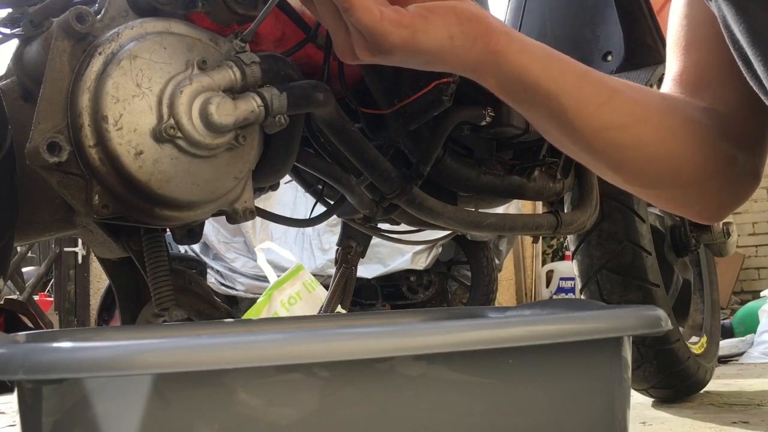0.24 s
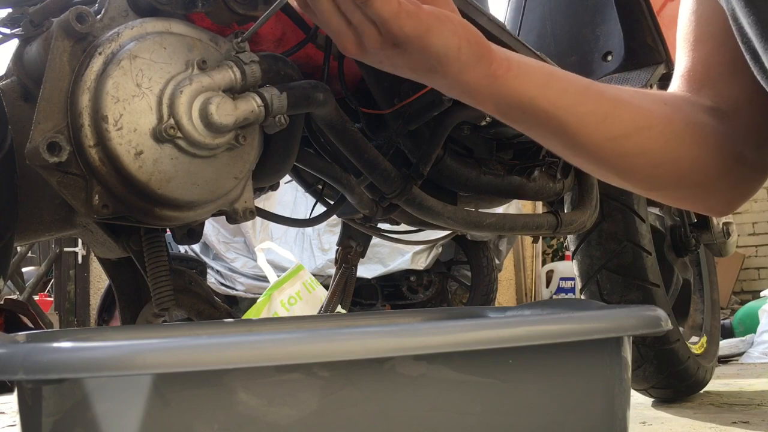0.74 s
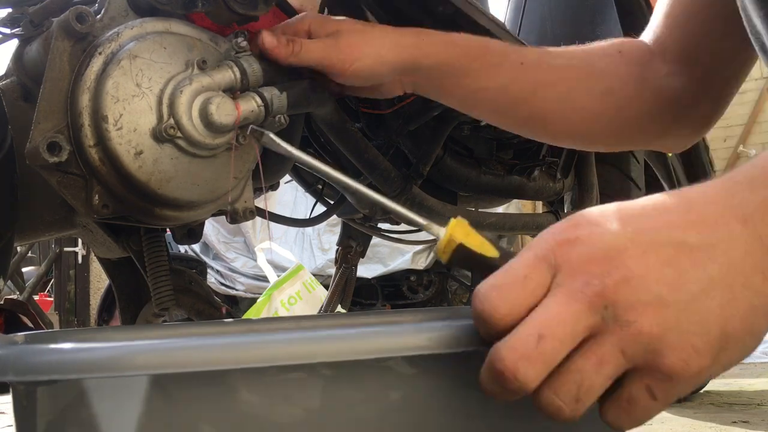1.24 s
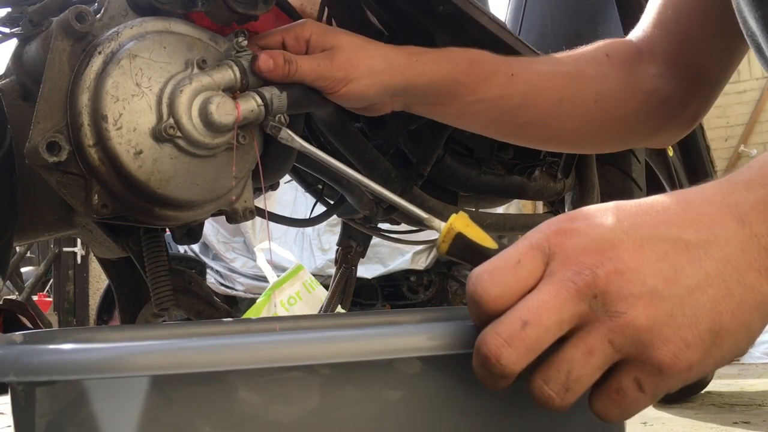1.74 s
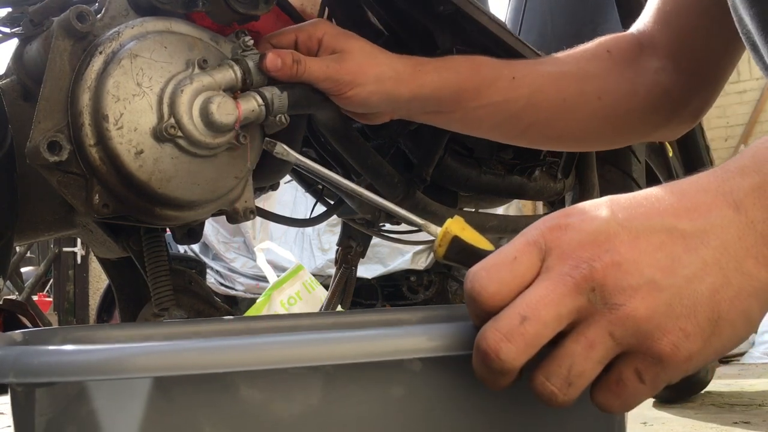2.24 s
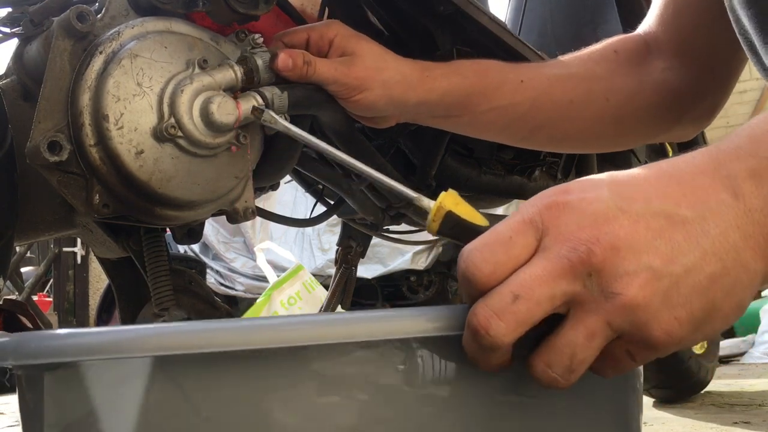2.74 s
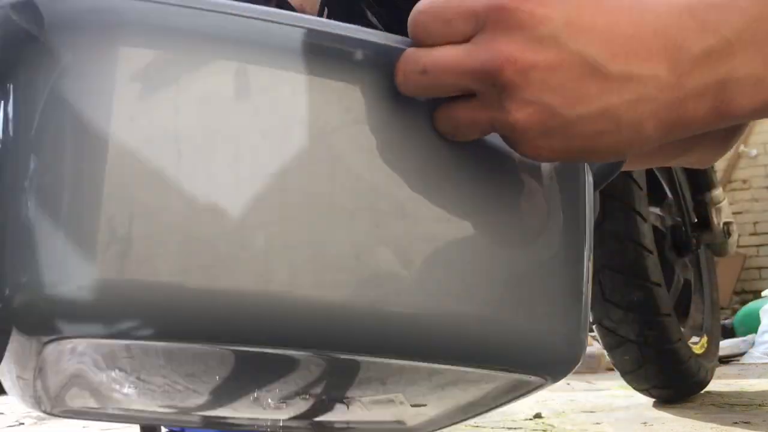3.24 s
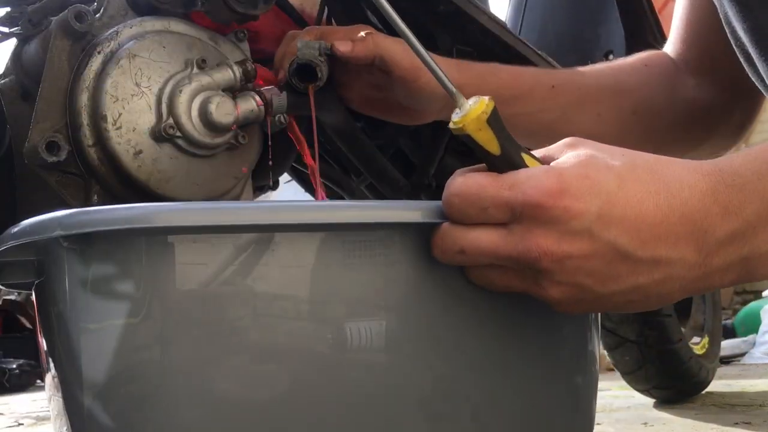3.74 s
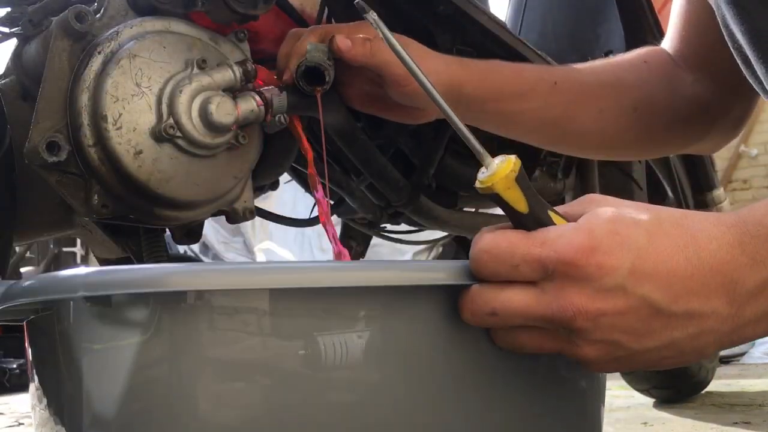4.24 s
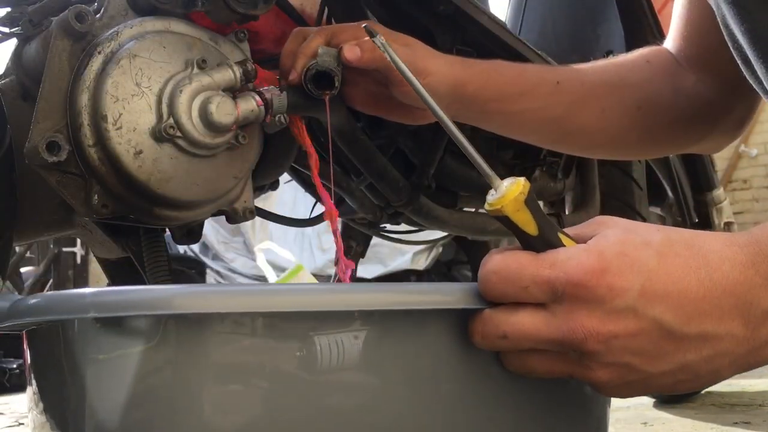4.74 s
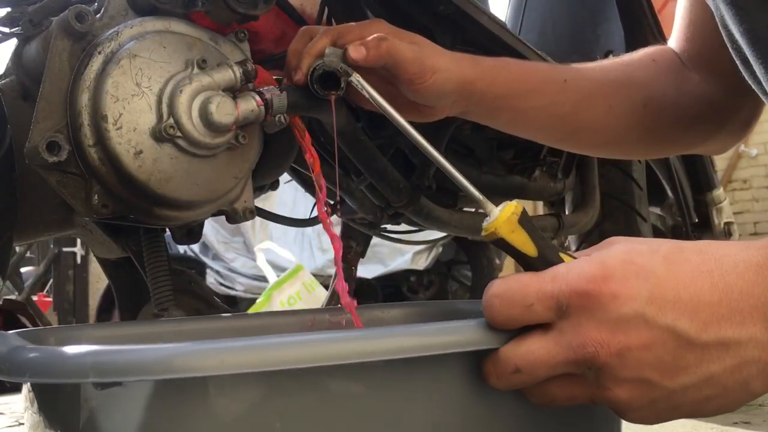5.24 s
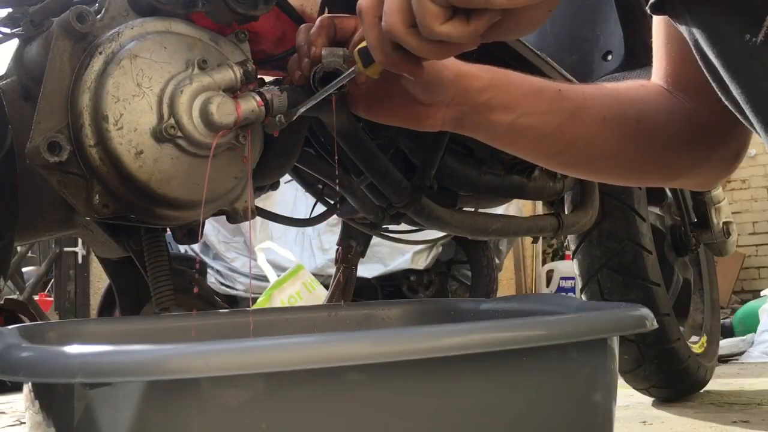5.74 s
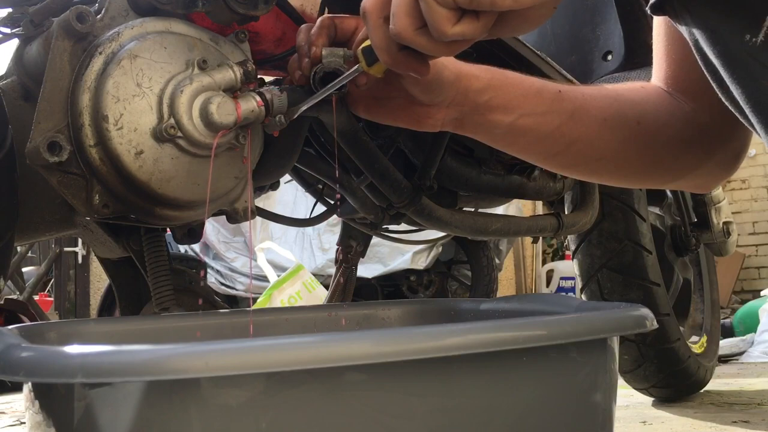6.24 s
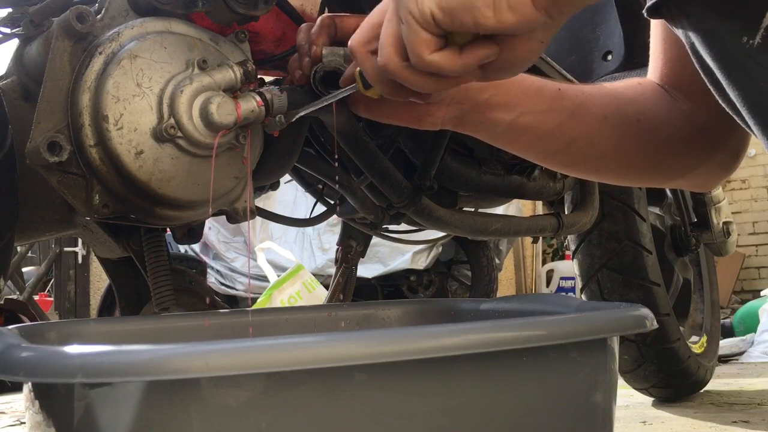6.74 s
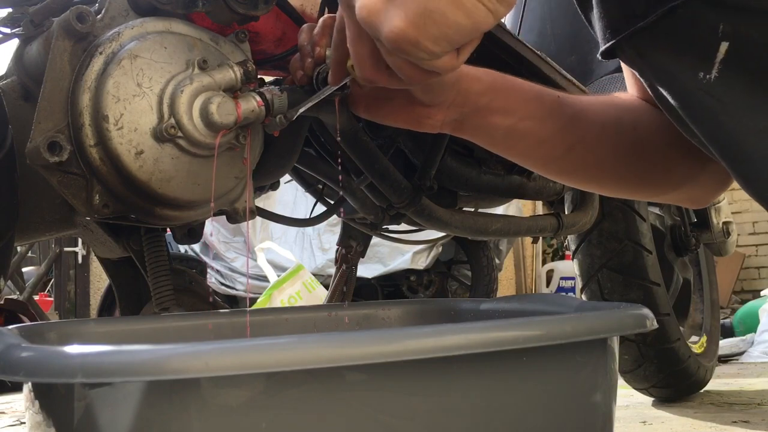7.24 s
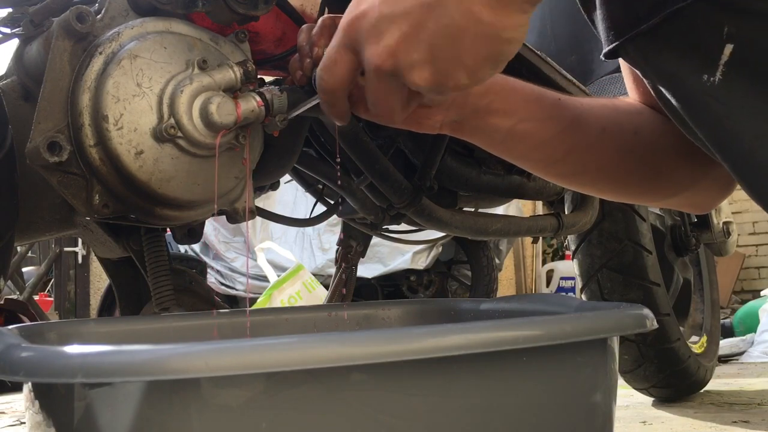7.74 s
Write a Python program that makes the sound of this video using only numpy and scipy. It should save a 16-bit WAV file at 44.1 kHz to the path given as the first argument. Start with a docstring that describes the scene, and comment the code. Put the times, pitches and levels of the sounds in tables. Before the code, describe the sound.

Plastic bowl knocks and scrapes on concrete, coolant gushes and patters into it, then sparse drips plink before sharp screwdriver snaps on a hose clip.

```python
"""Coolant drains from a scooter's water pump into a plastic bowl: gushes slap its bottom, drops patter, spray fizzes.
Before and during this the bowl is knocked, scraped and shoved; each contact excites its wall and bottom modes.
After the second of two silent jumps in time drips plink over faint patter, as gliding sine bubbles;
a screwdriver snaps off the hose clip. Behind: open-garage rumble, air, faint hums and hollow resonances,
rubbing hands and far birds, made from filtered noise and gliding sines."""
import sys
import numpy as np
from scipy import signal
from scipy.io import wavfile

SR = 44100
rng = np.random.default_rng(int(sys.argv[2]) if len(sys.argv) > 2 else 0)


def master_out(mix):
    """Clip the mix to full scale and print it as 16-bit PCM to the path in sys.argv[1]."""
    frames = np.transpose(np.atleast_2d(mix))
    ceiling = np.clip(frames, -1, 1)
    pcm = np.round(ceiling * 32767).astype(np.int16)
    wavfile.write(sys.argv[1], SR, pcm)


N = 352359
TIME = np.arange(N) / SR
AGE = TIME[:SR // 4]


def from_db(db):
    """Decibels to gain."""
    return 10 ** (np.asarray(db) / 20)


def rms_one(x):
    """Scale to rms 1."""
    return x / np.sqrt(np.mean(x ** 2) + 1e-20)


def gains(rows):
    """Each dB column of a curve as a gain per sample."""
    time_s, *columns = np.transpose(rows)
    return [from_db(np.interp(TIME, time_s, column)) for column in columns]


def add(out, time_s, sound):
    """Mix a sound in at a given time."""
    i = max(0, int(time_s * SR))
    out[i:i + len(sound)] += sound[:max(0, N - i)]


def dying(t60, age=AGE):
    """Envelope that loses 60 dB in t60."""
    return np.exp(-np.log(1000) * age / t60)


def drift(rate_hz):
    """Slow random curve through knots of spread 1."""
    return np.interp(TIME * rate_hz, np.arange(N // 20), rng.standard_normal(N // 20))


def swells(rows):
    """Gain over time of smooth bell-shaped strokes (middle [s], length [s], level [dB])."""
    return sum(from_db(db) * np.exp(-np.pi * ((TIME - middle_s) / length_s) ** 2)
               for middle_s, length_s, db in rows)


def decays(hits, t60, tail_db, tail_t60):
    """Gain over time of hits (time [s], level [dB]) that die fast, then linger; powers add."""
    power = np.zeros(N)
    shape = dying(t60) + from_db(tail_db) * dying(tail_t60)
    for time_s, db in hits:
        add(power, time_s, (from_db(db) * shape) ** 2)
    return np.sqrt(power)


EDGES_HZ = np.geomspace(20, 17500, 25)
BANK = [(np.sqrt(lo * hi), signal.butter(2, [lo, hi], "band", fs=SR, output="sos"))
        for lo, hi in zip(EDGES_HZ, EDGES_HZ[1:])]


def coloured(spectrum, size=N):
    """Noise of rms 1 from a bank of band-passes."""
    hz, db = np.transpose(spectrum)
    white = rng.standard_normal((2, size))   # neighbouring bands get separate noises
    out = np.zeros(size)
    for k, (centre_hz, sos) in enumerate(BANK):
        if hz[0] / 2 < centre_hz < hz[-1] * 2:
            gain = from_db(np.interp(np.log(centre_hz), np.log(hz), db))
            out += gain * signal.sosfilt(sos, white[k % 2])
    return rms_one(out)


def resonate(x, hz, width_hz):
    """Two-pole resonance, gain about 1 at its peak."""
    r = np.exp(-np.pi * width_hz / SR)
    zeros = np.array([1, 0, -1]) * (1 - r * r) / 2
    poles = [1, -2 * r * np.cos(2 * np.pi * hz / SR), r * r]
    return signal.lfilter(zeros, poles, x + 1e-18)


def struck(modes, detune=0):
    """A body's ring; every blow weights its modes a little differently and may detune them."""
    out = np.zeros(len(AGE))
    for k, (hz, db, t60) in enumerate(modes):
        gain = from_db(db + rng.normal()) * (-1) ** k
        bent_hz = hz * (1 + detune * rng.normal())
        out += gain * np.sin(2 * np.pi * bent_hz * AGE) * dying(t60)
    return out


def crowded_ring(hits, spectrum, t60, tail_db, tail_t60):
    """Modes too close to tell apart: each hit (time [s], level [dB]) starts a dying noise."""
    return decays(hits, t60, tail_db, tail_t60) * coloured(spectrum)


def echoes(x, t60, wet_db):
    """Direct sound plus dense reflections, which end after 0.25 s."""
    tail = rng.standard_normal(len(AGE)) * dying(t60) * (AGE > .001)
    return x + from_db(wet_db) * signal.fftconvolve(x, tail / np.linalg.norm(tail))[:N]


def grains(per_s, spread_db, clump_db):
    """Random clicks of uneven size that come in clumps."""
    born = rng.random(N) < per_s * from_db(clump_db * drift(25)) / SR
    size = from_db(spread_db * np.minimum(rng.exponential(1, N), 3))
    return born * size * rng.choice([-1, 1], N)


def bubble(hz, cycles, rise, swell, wobble):
    """A bubble swells, rings for some cycles and glides in pitch; the churning film makes it wobble."""
    age = AGE[:int(2 * cycles / hz * SR) + 8]
    life = age * hz / cycles
    shake = np.interp(age * hz / 2, np.arange(len(age)), rng.standard_normal(len(age)))
    glide = rise * (np.minimum(life, 1) - (swell + .5) / np.log(1000))   # about 0 at the loudest part
    pitch_hz = np.minimum(hz * (1 + glide + wobble * shake), SR * .4)
    sound = np.sin(2 * np.pi * np.cumsum(pitch_hz) / SR) * dying(0.86, life) * life ** swell
    return sound / np.abs(sound).max()


def bubble_cloud(low_hz, high_hz, per_s, cycles, rise, spread_db, tilt_db, count):
    """Random bubbles in clumps, dealt to pitches between low and high, tilted in dB per octave; rms 1."""
    born = grains(per_s, spread_db, clump_db=3.5)
    dealt = rng.integers(0, count, N)
    pitches_hz = np.geomspace(low_hz, high_hz, count)
    out = np.zeros(N)
    for i in np.flatnonzero(born):
        hz = pitches_hz[dealt[i]]
        gain = born[i] * from_db(tilt_db * np.log2(hz / low_hz))
        add(out, i / SR, gain * bubble(hz, cycles, rise, swell=0.82, wobble=0.16))
    return rms_one(out)


# flow curve: (time [s], patter level [dB], fizz level [dB])
FLOW_LEVELS = [(3.0, -110, -110), (3.2, -50, -57), (3.45, -54.5, -56), (3.7, -48, -54.5),
               (4.4, -44.5, -49.5), (4.75, -47.5, -63.5), (5.76, -41.5, -49.5), (5.8, -56, -73.5),
               (7.99, -51.5, -60.5)]
# surges and froth of the stream: (middle [s], length [s], level [dB])
STREAM_SURGES = [(4.54, .024, -49), (4.86, 0.056, -46.5), (5.29, 0.11, -55), (5.473, 0.025, -54)]
# heaviest gushes into the bowl: (time [s], relative level [dB])
GUSH_SLAPS = [(3.503, -36), (3.576, -29.5), (3.742, -25.5), (4.113, -26.5), (4.559, -21.5), (4.588, -20),
              (4.664, -24.5), (4.698, -19), (4.727, -19), (4.741, -21), (4.796, -26.5), (4.865, -29),
              (4.928, -24.5), (5.055, -32), (5.08, -21), (5.104, -28), (5.183, -33), (5.259, -24.5),
              (5.288, -22), (5.374, -31.5), (5.47, -24.5), (5.521, -20), (5.688, -24), (5.739, -18.5)]
# slap and spray noise: (frequency [Hz], density [dB per Hz])
SLAP_SPECTRUM = [(200, 9.5), (500, 7.5), (950, 3), (1700, -4.5), (3500, -28)]
SPRAY_SPECTRUM = [(1180, -20), (2000, 0), (3010, -4), (5880, -11), (10400, -13), (11600, -20),
                  (16000, -13.5)]
# brightest bubbles, here and in drips(): (time [s], relative level [dB], pitch [Hz])
BRIGHT_BUBBLES = [(3.577, -37, 3870), (3.784, -24, 4330), (3.828, -36, 8600), (4.113, -28, 6640),
                  (4.387, -39, 13900), (4.433, -38, 5270), (4.457, -27.5, 5300), (4.524, -33, 9900),
                  (4.679, -26.5, 5830), (4.733, -30.5, 9400), (4.814, -33.5, 6700), (4.846, -27.5, 11000),
                  (4.923, -37.5, 7430), (5.032, -37.5, 12100), (5.162, -28.5, 11900), (5.451, -29, 7450),
                  (5.628, -43, 7500), (5.663, -24.5, 12300), (6.07, -32, 14400), (6.545, -32.5, 5800),
                  (6.612, -36, 4500), (6.733, -38, 5630), (6.78, -36, 12700), (6.826, -37, 4730),
                  (7.099, -28.5, 13800), (7.29, -34.5, 4340), (7.798, -36.5, 11300), (7.889, -39, 5100),
                  (7.924, -38.5, 8100)]
# bowl bottom, here and in bowl_knocks(): (mode [Hz], level [dB], t60 [s])
BOTTOM_MODES = [(78.3, -9.5, 0.2), (143.3, -5, 0.098), (204, -6.5, 0.054), (269.7, -1.5, 0.09),
                (339.3, -5, 0.13), (393.3, -2, 0.1)]
SLAP_GAIN_DB, GULP_RE_SLAP_DB, GUSH_SPRAY_RE_FIZZ_DB = 4, -10, 7
DRUM_DB, COVERED_S, DAMPING_DB_PER_S = 4, 4.88, 9.5   # the pool covers the bottom and damps its drumming


def stream():
    """Gushes slap, plop and throw spray; small drops patter and drum on the bottom; the pool fizzes in surges."""
    patter, fizz = gains(FLOW_LEVELS)
    fizz = fizz * from_db(5 * drift(22)) + swells(STREAM_SURGES)
    gushes = [(time_s, db + SLAP_GAIN_DB) for time_s, db in GUSH_SLAPS]
    slaps = crowded_ring(gushes, SLAP_SPECTRUM, t60=0.0087, tail_db=-6.5, tail_t60=0.17)
    spray_hits = [(time_s, GUSH_SPRAY_RE_FIZZ_DB + 3 * rng.normal()) for time_s, _ in gushes]
    spray = fizz * crowded_ring(spray_hits, SPRAY_SPECTRUM, t60=0.021, tail_db=-7.0, tail_t60=0.2)

    gulps = np.zeros(N)   # each gush traps a bubble
    for time_s, db in gushes:
        gulp = bubble(rng.uniform(870, 1180), cycles=10.8, rise=-0.14, swell=0.074, wobble=0.076)
        add(gulps, time_s, from_db(db + GULP_RE_SLAP_DB) * gulp)
    plops = bubble_cloud(850, 2200, per_s=190, cycles=4, rise=-0.1, spread_db=4.0, tilt_db=-5.0, count=30)
    fine = bubble_cloud(2970, 15000, per_s=190, cycles=29, rise=0.35, spread_db=6.5, tilt_db=4.5, count=60)

    # spray crackles as it lands; each bright bubble scatters droplets
    splatter = bubble_cloud(1500, 15000, per_s=1100, cycles=12, rise=0.1, spread_db=5, tilt_db=3.5, count=50)
    scatter_hits = [(time_s, db) for time_s, db, _ in BRIGHT_BUBBLES]
    thrown = decays(scatter_hits, t60=0.02, tail_db=-6.5, tail_t60=0.14)
    splatter *= from_db(-9.5) * fizz + from_db(-20) * thrown
    bubbling = gulps + from_db(-7.0) * patter * plops + from_db(-6.5) * fizz * fine
    wet = echoes(bubbling + splatter, t60=0.04, wet_db=-2.5)

    taps = grains(per_s=160, spread_db=4.5, clump_db=4.0)
    drum = rms_one(signal.fftconvolve(taps, struck(BOTTOM_MODES))[:N])
    bare = from_db(DRUM_DB - DAMPING_DB_PER_S * np.maximum(TIME - COVERED_S, 0))
    return from_db(-10.5) * slaps + spray + wet + patter * bare * drum


# fattest drops: (time [s], relative level [dB], pitch [Hz])
FAT_DROPS = [(5.848, -42, 3150), (5.877, -32.5, 2220), (5.933, -31, 2930), (6.0153, -32.5, 2250),
             (6.1272, -35.5, 1880), (6.1686, -32, 2500), (6.285, -41.5, 2060), (6.366, -41.5, 1380),
             (6.43, -37.5, 1980), (6.5185, -36, 1450), (6.615, -43, 1440), (6.682, -40.5, 1450),
             (6.735, -42, 3100), (6.832, -39.5, 1910), (6.903, -38.5, 1420), (7.061, -38.5, 1550),
             (7.19, -43, 1960), (7.249, -37, 1750), (7.291, -23.5, 2370), (7.36, -41, 1940),
             (7.486, -37, 3040), (7.53, -30.5, 2740), (7.72, -43.5, 1350), (7.779, -38, 1330),
             (7.841, -31.5, 1380), (7.96, -37.5, 1400)]
# contact crack, here and in bowl_knocks(): (frequency [Hz], density [dB per Hz])
CRACK_SPECTRUM = [(1000, -94), (2500, 6.5), (4000, 4), (7000, 3), (10000, -1), (16000, -16)]
# silent jumps in time, here and in record(): (start [s], end [s])
TIME_JUMPS = [(1.318, 1.345), (5.771, 5.812)]
DROP_GAIN_DB, BUBBLE_GAIN_DB = 3.5, -5
PLINKS_DB, CHIRPS_DB = -62, -64.5   # the last thread breaks into droplets, which trap tiny bubbles


def drips():
    """Drops plink on the shallow pool, falling in pitch; bubbles chirp upward; the bowl's walls throw both back."""
    out = np.zeros(N)
    drops = [(time_s, db + DROP_GAIN_DB, hz) for time_s, db, hz in FAT_DROPS]
    pings = [(time_s, db + BUBBLE_GAIN_DB, hz) for time_s, db, hz in BRIGHT_BUBBLES]
    for time_s, db, hz in drops:
        cycles = 16 * np.exp(.2 * rng.normal())
        add(out, time_s, from_db(db) * bubble(hz, cycles, rise=-0.26, swell=0.03, wobble=0.048))
    for time_s, db, hz in pings:
        add(out, time_s, from_db(db) * bubble(hz, cycles=37.2, rise=0.72, swell=1.56, wobble=0.098))
    plinks = bubble_cloud(1300, 3600, per_s=65, cycles=8, rise=-0.2, spread_db=2.5, tilt_db=-2.5, count=30)
    chirps = bubble_cloud(5500, 13000, per_s=30, cycles=24, rise=0.5, spread_db=6, tilt_db=-1.0, count=40)
    after_jump = TIME > TIME_JUMPS[-1][1]
    out += after_jump * (from_db(PLINKS_DB) * plinks + from_db(CHIRPS_DB) * chirps)
    hits = np.array(drops + pings)[:, :2]
    ticks = crowded_ring(hits, CRACK_SPECTRUM, t60=0.021, tail_db=-44, tail_t60=0.029)
    return echoes(out, t60=0.04, wet_db=0.5) + from_db(-18.5) * ticks


# knocks: (time [s], wall clack [dB], bottom thump [dB], contact crack [dB], loss per rebound [dB])
BOWL_KNOCKS = [(1.347, -45, -71, -46.5, 22), (1.366, -27, -28.5, -35.5, 20),
               (2.703, -18, -16.5, -30.5, 8.5), (2.729, -17.5, -10.5, -54, 19),
               (2.82, -18.5, -15.5, -50, 22), (2.911, -6.5, -42, -34, 23), (2.915, 1, -17, -27, 5),
               (2.953, -8.5, -15, -47, 12), (2.986, -24, -38, -49, 30), (3.014, -19.5, -23.5, -46, 28),
               (3.136, -38, -50, -57.5, 17), (3.195, -24.5, -58, -56.5, 22), (3.326, -28.5, -20, -42, 5),
               (3.358, -7.5, 6.5, -33, 37), (3.44, -33, -45, -53, 22), (3.711, -22.5, -8, -49, 22),
               (4.985, -10.5, -12.5, -41.5, 35)]
# bowl wall, here and in bowl_scrapes(): (mode [Hz], level [dB], t60 [s])
WALL_MODES = [(609, -1, 0.14), (983, 1.5, 0.097), (1057, -19, 0.079), (1711, 1.5, 0.055),
              (2040, -0.5, 0.035)]
# clack noise of the wall: (frequency [Hz], density [dB per Hz])
CLACK_SPECTRUM = [(300, -36), (600, 5), (800, 4), (1200, 4), (1900, -2.5), (3000, -10), (6000, -52)]
REBOUND_S = 0.015   # nominal spacing


def bowl_knocks():
    """The light bowl rattles in runs of four weakening contacts: each cracks, clacks the wall, thumps the bottom."""
    out, contacts = np.zeros(N), []
    for time_s, *levels_db, loss_db in BOWL_KNOCKS:
        for k in range(4):
            contact_s = time_s + REBOUND_S * k * rng.uniform(.9, 1.2)
            contacts.append((contact_s, *(np.array(levels_db) - k * loss_db)))
    contacts = np.array(contacts)
    for time_s, clack_db, thump_db, _ in contacts:
        add(out, time_s, from_db(clack_db - 20.0) * struck(WALL_MODES))
        add(out, time_s, from_db(thump_db - 12.0) * struck(BOTTOM_MODES))
    clack = crowded_ring(contacts[:, [0, 1]], CLACK_SPECTRUM, t60=0.053, tail_db=-19.0, tail_t60=0.17)
    crack = crowded_ring(contacts[:, [0, 3]], CRACK_SPECTRUM, t60=0.027, tail_db=-6.0, tail_t60=0.094)
    return out + from_db(-13.5) * clack + crack


# creeping of the bowl over the floor: (middle [s], length [s], level [dB])
BOWL_DRAGS = [(2.915, 0.079, -30.5), (3.255, 0.038, -41), (3.56, 0.13, -33), (3.95, 0.21, -43)]
# jerks that shove it on: (middle [s], length [s], level [dB])
BOWL_SHOVES = [(3.726, 0.014, -17), (3.794, 0.029, -22.5), (3.877, 0.029, -39), (4.05, 0.035, -19.5),
               (4.11, 0.03, -35), (4.308, 0.051, -23), (4.388, 0.022, -27.5), (4.572, 0.019, -20.5),
               (4.597, 0.025, -24), (4.65, 0.02, -28.5)]
# resonances of the sliding bowl: (frequency [Hz], width [Hz], level [dB])
JUDDER_RESONANCES = [(268, 154, 4.5), (372, 35.4, 11), (574, 78, -15), (1070, 360, -19.5)]
DRAG_UNEVEN_DB = 4.5   # it catches and lets go
SLIP_HZ, SLIP_JITTER = 130.2, .13   # jitter: spread of the log rate


def bowl_slides():
    """The bottom sticks and slips on concrete at a wandering rate and judders; grit scratches under it."""
    push = swells(BOWL_DRAGS) * from_db(DRAG_UNEVEN_DB * drift(45)) + swells(BOWL_SHOVES)
    rate_hz = SLIP_HZ * np.exp(SLIP_JITTER * drift(110))
    turns = np.floor(np.cumsum(rate_hz) / SR)
    slips = np.diff(turns, prepend=0) * from_db(3.1 * rng.standard_normal(N))
    judder = sum(from_db(db) * resonate(resonate(slips, hz, width_hz), hz, width_hz * 4)
                 for hz, width_hz, db in JUDDER_RESONANCES)
    grit = rms_one(resonate(grains(per_s=900, spread_db=5.5, clump_db=1.5), 1800, 870))
    return push * (rms_one(judder) + from_db(-22) * grit)


# scrapes of the bowl's edge: (start [s], length [s], pressure level towards the end [dB])
EDGE_SCRAPES = [(2.672, 0.063, -31), (2.804, 0.026, -38.5), (2.845, 0.09, -36), (3.033, .045, -44)]
SCRAPE_GROWTH_DB = 4   # each bites harder as it goes


def bowl_scrapes():
    """The edge bites, grates over concrete and lets go: uneven catches crackle and ring the wall."""
    pressure = np.zeros(N)
    for start_s, length_s, db in EDGE_SCRAPES:
        to_go = np.linspace(1, 0, int(length_s * SR))
        release = np.minimum(1, 4 * to_go)
        add(pressure, start_s, from_db(db - SCRAPE_GROWTH_DB * to_go) * release)
    catches = pressure * rms_one(grains(per_s=660, spread_db=3.5, clump_db=5))
    ring = struck(WALL_MODES)
    ringing = signal.fftconvolve(catches, ring / np.linalg.norm(ring))[:N]
    return from_db(-6) * ringing + from_db(7.5) * resonate(catches, 970, 1000)


CLIP_SNAPS = [(0.55, -38.5), (1.505, -37.5), (1.808, -41), (2.495, -37.5), (7.559, -5), (7.564, 4),
              (7.574, 6), (7.583, 3), (7.59, -1.5)]
# hose clip: (mode [Hz], level [dB], t60 [s])
CLIP_MODES = [(622, -6.5, 0.092), (1292, -1, 0.078), (1380, 0, 0.03), (2530, 1.5, 0.044), (3980, -5, 0.056),
              (6000, -10, 0.054), (7400, -13, 0.051)]
# snap noise: (frequency [Hz], density [dB per Hz])
SNAP_SPECTRUM = [(400, -4.5), (650, 1), (950, 4), (1300, 11), (2500, 8.5), (3300, 2), (7000, -1.5),
                 (11000, -0.5), (13000, -14), (16000, -44)]
CLIP_BEND = 0.019   # spread of the bending clip's mode shifts, as a share


def screwdriver():
    out = from_db(-14.5) * crowded_ring(CLIP_SNAPS, SNAP_SPECTRUM, t60=0.016, tail_db=-13.5, tail_t60=0.12)
    for time_s, db in CLIP_SNAPS:
        add(out, time_s, from_db(db - 22.5) * struck(CLIP_MODES, detune=CLIP_BEND))
    return signal.sosfilt(signal.butter(2, 330, "high", fs=SR, output="sos"), out)


# hands on the bowl, fingers on the hose: (middle [s], length [s], level [dB])
BOWL_RUBS = [(1.38, 0.13, -50), (1.59, 0.02, -46.5), (1.9, 1, -61), (2.66, .28, -54.5), (2.93, 0.29, -47)]
HOSE_RUSTLES = [(.25, 0.14, -65), (.553, 0.011, -52), (.63, 0.055, -70), (1.04, .16, -64),
                (1.595, .036, -58)]
# their noises: (frequency [Hz], density [dB per Hz])
RUB_SPECTRUM = [(300, 10), (520, -13), (800, 9), (1200, -5.5), (2500, -9.5), (5000, -17), (16000, -34)]
RUSTLE_SPECTRUM = [(1500, -41), (3500, 8), (7000, 1), (14000, 2.5), (16000, -11)]


def hands():
    """Hands rub on the bowl and rustle on the hose: uneven strokes of coloured noise."""
    out = np.zeros(N)
    for strokes, spectrum in [(BOWL_RUBS, RUB_SPECTRUM), (HOSE_RUSTLES, RUSTLE_SPECTRUM)]:
        out += swells(strokes) * coloured(spectrum) * from_db(4.4 * drift(110))
    return out


# far bird calls: (start [s], length [s], start pitch [Hz], end pitch [Hz], relative level [dB])
BIRD_CALLS = [(0.1, 0.043, 2960, 3650, -58), (0.19, 0.037, 3600, 4600, -61.5),
              (0.33, 0.045, 3100, 3800, -57.5), (0.015, 0.093, 2100, 2300, -68),
              (0.45, 0.21, 2000, 2000, -68)]
WARBLE = .018   # spread of the pitch tremble, as a share


def birds():
    """Short far whistles that tremble, blurred by the walls outside."""
    out = np.zeros(N)
    for start_s, length_s, start_hz, end_hz, db in BIRD_CALLS:
        pitch_hz = np.linspace(start_hz, end_hz, int(length_s * SR))
        pitch_hz *= 1 + WARBLE * drift(304)[:len(pitch_hz)]
        whistle = np.sin(2 * np.pi * np.cumsum(pitch_hz) / SR)
        add(out, start_s, from_db(db) * np.sqrt(np.hanning(len(pitch_hz))) * whistle)
    return echoes(out * from_db(4 * drift(90) - 4), t60=.14, wet_db=3)


# faint hums and hollow resonances: (start [s], end [s], frequency [Hz], width [Hz], level [dB])
BACKGROUND_HUMS = [(0.031, 1.3, 73, 14.5, -47), (0.16, 2.2, 138.2, 9.3, -52), (1.3, 8.7, 305.4, 49, -58),
                   (0.21, 10, 625, 75, -67.5), (1.34, 2.18, 600, 170, -55.5)]
# blurred tone behind the drips: (middle [s], length [s], level [dB])
FAR_TONE_SWELLS = [(6.0, 0.16, -54.5), (6.39, .07, -62), (6.66, .08, -59)]
FAR_TONE_HZ, FAR_TONE_WIDTH_HZ = 2360, 200


def background_hums():
    """Faint background hums and hollow resonances, made as narrow noise; a faint blurred tone comes and goes."""
    out = np.zeros(N)
    for start_s, end_s, hz, width_hz, db in BACKGROUND_HUMS:
        hum = resonate(resonate(rng.standard_normal(N), hz, width_hz), hz, width_hz * 3)
        out += from_db(db) * (TIME >= start_s) * (TIME < end_s) * rms_one(hum)
    tone = resonate(rng.standard_normal(N), FAR_TONE_HZ, FAR_TONE_WIDTH_HZ)
    tone = resonate(tone, FAR_TONE_HZ, FAR_TONE_WIDTH_HZ * 2)
    return out + swells(FAR_TONE_SWELLS) * rms_one(tone)


# rumble and outdoor air: (time [s], level [dB])
RUMBLE_LEVELS = [(0, -31), (.25, -45.5), (2.5, -46), (4.0, -43.5), (4.7, -40.5), (5.77, -38.5), (5.81, -61),
                 (7.99, -58)]
AIR_LEVELS = [(0, -57), (1.3, -64.5), (1.36, -58), (2.3, -60), (5.8, -56), (7.99, -54.5)]
# their noises: (frequency [Hz], density [dB per Hz])
RUMBLE_SPECTRUM = [(22, -54), (40, -3), (59, 12), (96, 2.5), (146, -2.5), (189, -23), (300, -49)]
AIR_SPECTRUM = [(100, 11.5), (190, -16), (310, 10.5), (420, 3), (620, -2.5), (800, -2.5), (1300, -8.5),
                (3000, -12), (4800, -17.5), (6000, -18.5), (16000, -26.5)]


def rumble_and_air():
    """Low rumble and outdoor air: coloured noises of varying level."""
    rumble = gains(RUMBLE_LEVELS)[0] * coloured(RUMBLE_SPECTRUM)
    air = gains(AIR_LEVELS)[0] * coloured(AIR_SPECTRUM)
    return rumble + air


def scene():
    """All near sounds but the hands share a little of the garage's ring."""
    near = stream() + drips() + bowl_knocks() + bowl_slides() + bowl_scrapes() + screwdriver()
    surroundings = hands() + birds() + background_hums() + rumble_and_air()
    return (echoes(near, t60=.4, wet_db=-42.5) + surroundings)[None]


def record(dry):
    """The sound cuts out and fades back at each jump; peaks are rounded, the top is cut."""
    gate = np.ones(N)
    for start_s, end_s in TIME_JUMPS:
        fade = np.clip((TIME - start_s) / (end_s - start_s), 0, 1) ** 3
        gate *= np.where(TIME < start_s, 1, fade)
    low_pass = signal.cheby2(16, 70, 17100, fs=SR, output="sos")   # 70 dB down from 17.1 kHz
    return signal.sosfilt(low_pass, np.tanh(dry * gate))


dry = scene()
out = record(dry)
master_out(out)
```